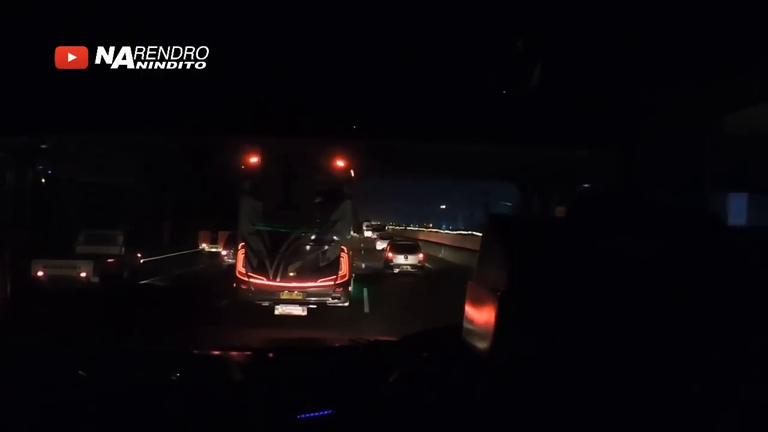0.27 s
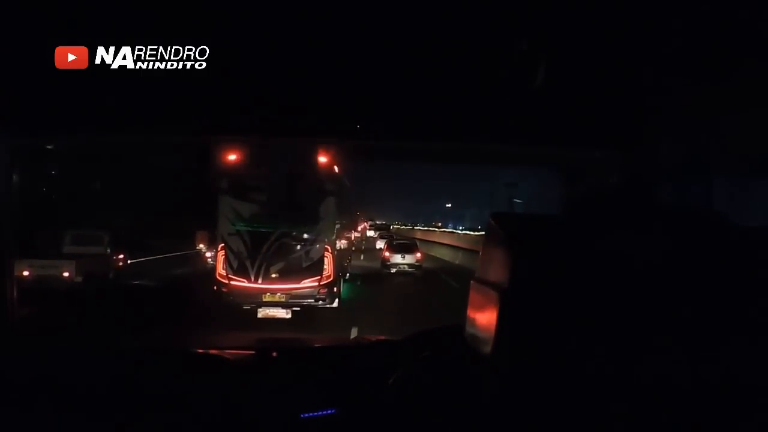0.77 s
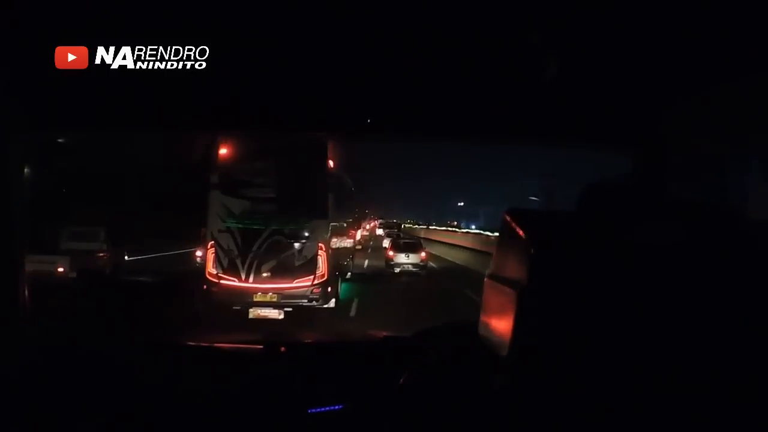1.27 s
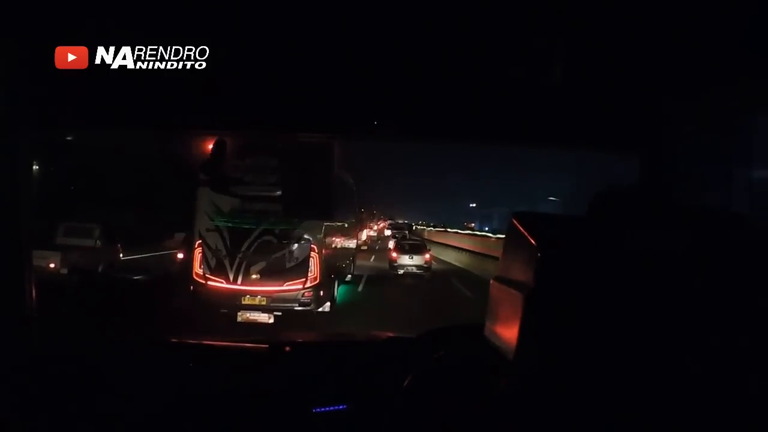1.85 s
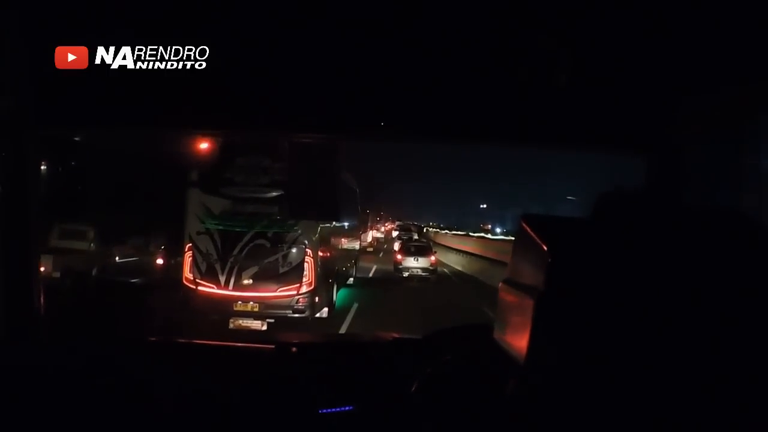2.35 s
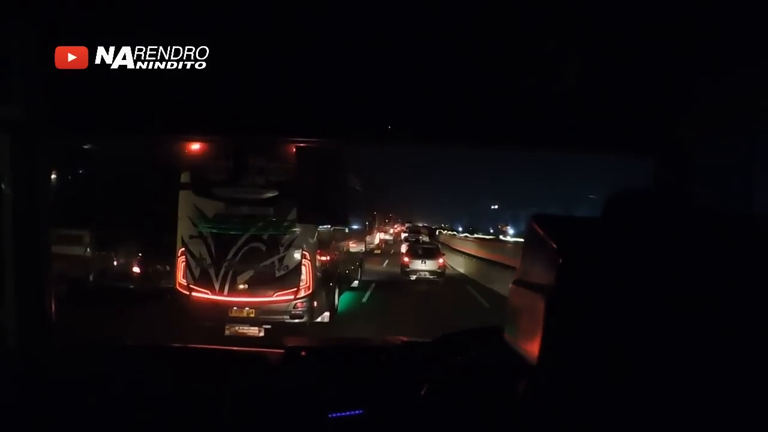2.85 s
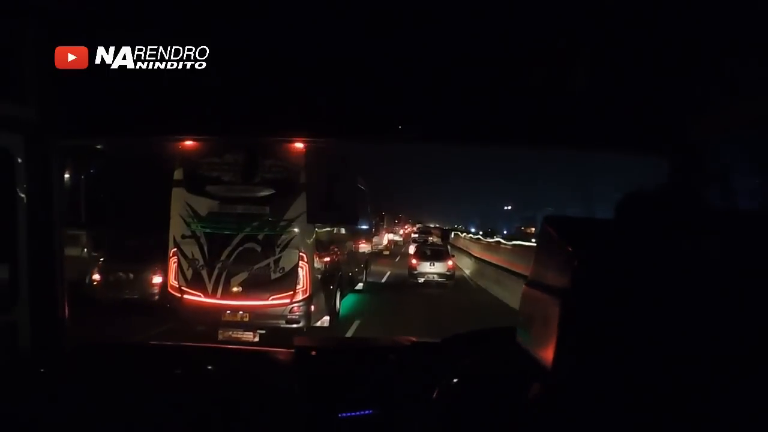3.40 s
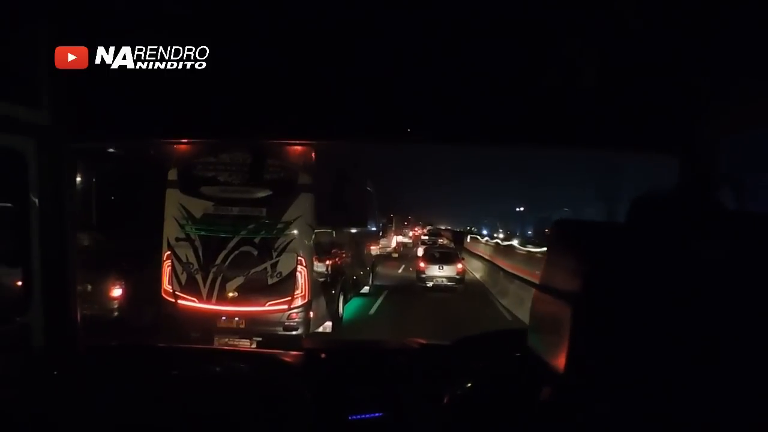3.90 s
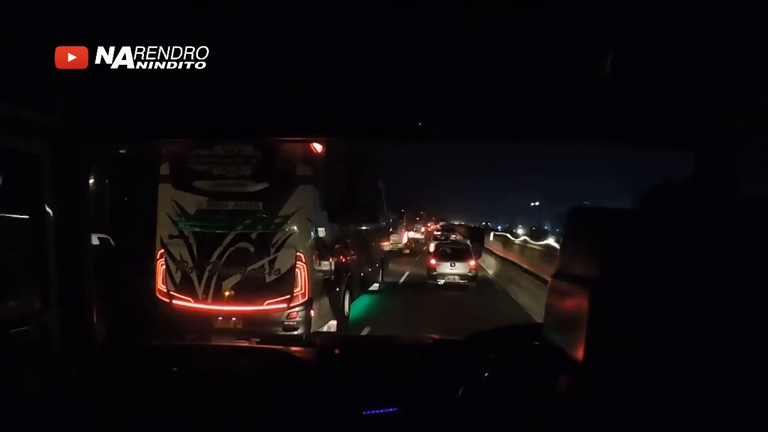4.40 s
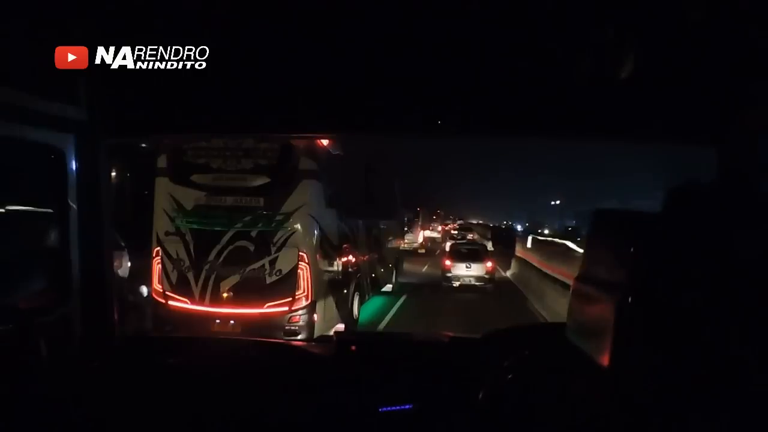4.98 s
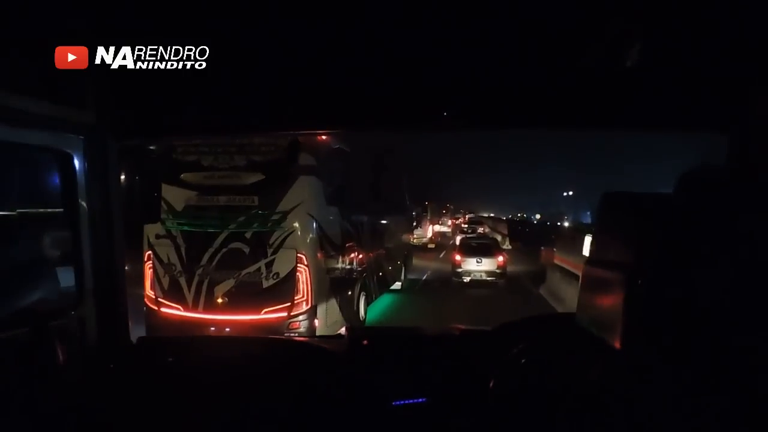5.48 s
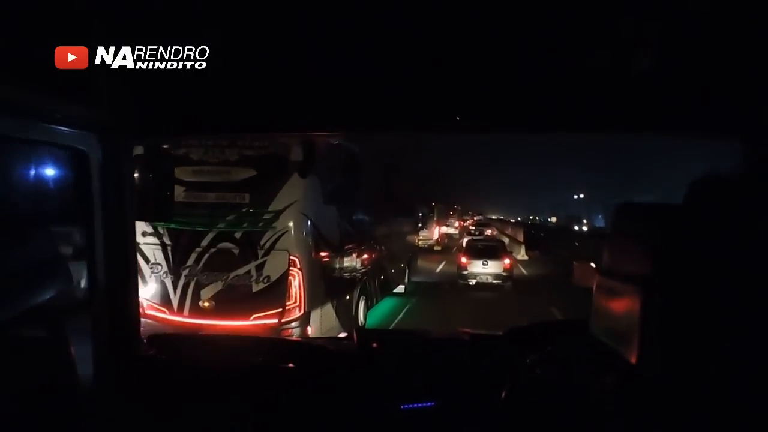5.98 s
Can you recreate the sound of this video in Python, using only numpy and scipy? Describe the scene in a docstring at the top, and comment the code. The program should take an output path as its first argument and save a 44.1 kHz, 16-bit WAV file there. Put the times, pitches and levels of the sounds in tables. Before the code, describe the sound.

A continuous bus cab interior lasting just over six seconds, close and bass heavy. A diesel drone around 70 Hz throbs about eight times a second, its pitch creeping up barely at all, over a very deep cabin boom, tyre rumble and changing road shudder. Muffled wind rush and soft seal hiss swell at about 1.2, 2.3, 3.6 and most strongly 5.4 seconds, easing between. Faint blower tones persist; a thin gear whine bends in from 1.7 to 4.3. A slightly brighter tyre wash passes between 1.3 and 2.3. Soft floor thumps come at 1.1, 2.2 to 2.3, 3.5, 3.8 and 5.5, with dull knocks at 2.26, 2.35 and 3.5 and a weaker one at 4.7. Tiny sharp ticks fall at 1.6 and 2.65. Brief high trim squeaks appear at 1.1, 2.6, 3.0, 4.35, 5.0, 5.3 and 6.0, over faint grainy panel rattle and narrow airy whistles.

```python
"""Inside a bus cab

A diesel engine throbs as wavering tones at multiples of its firing rate, with thin blower and gear whines.
Under it, shaped noise makes road shudder, tyre rumble and a deep boom of the cabin air.
Wind noise rushes in swells of an airflow curve and hisses at the seals with a level curve of its own.
Narrow bands of noise whistle at the seals, and damped tones thump the floor at bumps.
Panels rattle, loose fittings tick and knock in short noise bursts, and resonances of the trim squeak.
"""
import sys
import numpy as np
from scipy import signal
from scipy.fft import rfft, irfft
from scipy.io import wavfile
from scipy.ndimage import uniform_filter1d

SR = 44100
rng = np.random.default_rng(int(sys.argv[2]) if len(sys.argv) > 2 else 0)


def log_audio(samples):
    """Write samples as a 16-bit WAV file to the path given in sys.argv[1]."""
    # one column per channel
    frames = np.atleast_2d(samples).T
    # limit to full scale, then quantise
    limited = np.clip(frames, -1, 1)
    pcm = np.round(limited * 32767).astype(np.int16)
    wavfile.write(sys.argv[1], SR, pcm)


N = 275625
TIME = np.arange(N) / SR  # [s]
BINS = np.maximum(np.arange(N // 2 + 1) * SR / N, 1)  # frequency of each Fourier bin [Hz]


def from_db(db):
    """Logarithmic level: 20 dB is a factor of ten in amplitude."""
    return 10 ** (np.asarray(db) / 20)


def rms_one(x):
    """Normalisation: the mean of the channels is scaled to rms 1."""
    middle = np.atleast_2d(x).mean(axis=0)
    return x / np.sqrt(np.mean(middle ** 2) + 1e-20)


def in_time(rows):
    """Linear interpolation: each column of a curve is read sample by sample."""
    times, *columns = np.transpose(rows)
    return [np.interp(TIME, times, column) for column in columns]


def at_hz(points, hz):
    """Logarithmic frequency axis: equal ratios of frequency are equal steps."""
    table_hz, value = np.transpose(points)
    return np.interp(np.log(hz), np.log(table_hz), value)


def drift(rate_hz):
    """Low-passed noise: a slow random signal of rms 1."""
    return rms_one(irfft(rfft(rng.standard_normal(N)) / (1 + (BINS / rate_hz) ** 4), N))


def colour(spectrum):
    """Spectral shaping: the gain per bin follows a spectrum and falls steeply past its ends."""
    low_skirt = 1 + (spectrum[0][0] / BINS) ** 4
    high_skirt = 1 + (BINS / (2 * spectrum[-1][0])) ** 4
    return from_db(at_hz(spectrum, BINS)) / (low_skirt * high_skirt)


# interaural level difference: (frequency [Hz], left minus right [dB])
LEVEL_DIFFERENCE = [(17, -5.8), (30, -3.3), (55, -.2), (80, -.2), (140, 1.4), (320, 2), (750, 2.3),
                    (1500, .2), (14000, .3)]
# interaural phase difference: (frequency [Hz], lead of the left side [rad])
PHASE_LEAD = [(15, -0.51), (32, 0.94), (70, 0.46), (140, 0.32), (280, -0.25), (550, -0.4), (1300, -0.38),
              (1800, 0.25), (3000, -0.24)]


def pan(hz):
    """Interaural differences: complex gains place a frequency in the left and right channels."""
    sides = np.array([[.5], [-.5]])
    level = from_db(sides * at_hz(LEVEL_DIFFERENCE, hz))
    return level * np.exp(1j * sides * at_hz(PHASE_LEAD, hz))


# interchannel coherence of the noise: (frequency [Hz], left-right correlation [1 = alike])
COHERENCE = [(20, .985), (200, .985), (500, .91), (900, .8), (1500, .6), (2200, .1), (2800, -.1),
             (4000, -.22), (8000, 0), (14000, .15)]


def cab_noise(gain):
    """Diffuse field: coloured stereo noise, alike in the bass and less alike in the treble; rms 1."""
    mid, side = rfft(rng.standard_normal((2, N)))
    alike = np.clip(at_hz(COHERENCE, BINS), -.99, .99)
    shared = np.sqrt(1 + alike) * mid
    opposed = np.sqrt(1 - alike) * side * np.array([[1], [-1]])
    return rms_one(irfft((shared + opposed) * gain * pan(BINS), N))


def even(x, size):
    """Level control: a noise is held near rms 1 over windows of size samples."""
    power = uniform_filter1d(x.mean(axis=0) ** 2, size)
    return x / np.sqrt(power + 1e-3)


def line(hz, waver, waver_hz):
    """Random modulation: a stereo tone of rms about 1 wavers in strength and phase."""
    turns = np.cumsum(hz * np.ones(N)) / SR
    wander = drift(waver_hz) + 1j * drift(waver_hz)
    shake = (1 + waver * wander) * np.sqrt(2 / (1 + 2 * waver ** 2))
    return np.real(shake * np.exp(2j * np.pi * turns) * pan(np.mean(hz)))


def band(x, low_hz, high_hz):
    """Band-pass filtering: a causal Butterworth filter passes one range of frequencies."""
    edges = [low_hz, min(high_hz, SR / 2 - 500)]
    return signal.sosfilt(signal.butter(2, edges, "band", fs=SR, output="sos"), x)


def brighten(x, corner_hz, treble_db, order):
    """Time-varying shelf: the treble above a corner changes by treble_db."""
    dull = irfft(rfft(x) / (1 + (BINS / corner_hz) ** order), N)
    return dull + (x - dull) * from_db(treble_db)


# strength of the airflow round the body, used here relative to its mean: (time [s], level [dB])
AIRFLOW_LEVEL = [(0.05, -45.5), (0.5, -45), (0.56, -42.5), (0.75, -44.5), (0.89, -44.5), (1.16, -40),
                 (1.25, -43), (2.05, -41), (2.31, -37.5), (2.49, -43.5), (2.75, -42), (2.8, -44.5),
                 (2.95, -46), (3.14, -45.5), (3.51, -39.5), (3.77, -39.5), (3.92, -42), (4.12, -41.5),
                 (4.27, -44), (4.52, -42.5), (4.69, -41), (4.76, -44), (5.17, -44), (5.39, -40),
                 (5.46, -38), (5.52, -39), (5.65, -42.5), (5.78, -43.5), (6.21, -41.5)]


def swell(lag_s=0):
    """Common modulation: the airflow in dB about its mean, felt after a lag, drives many layers."""
    flow_db = in_time(AIRFLOW_LEVEL)[0]
    return np.interp(TIME - lag_s, TIME, flow_db - flow_db.mean())


# broadband spectrum of the rushing air: (frequency [Hz], relative level per Hz [dB])
RUSH_SPECTRUM = [(120, 3.5), (300, 0), (420, 0.5), (475, -3.5), (570, 0.5), (750, 0), (965, -3), (1015, -6),
                 (1220, -2.5), (1420, -7.5), (1900, -9.5), (2850, -15.5), (3500, -25), (6000, -52)]
# cab resonances that colour the rush: (centre [Hz], full width at half the dB height [Hz], height [dB])
CAB_RESONANCES = [(553, 69, 3.5), (816, 33, 4), (947, 49, 1.5), (2310, 180, -1.5), (2400, 59, 3.5)]
RUSH_DB, RUSH_FOLLOWS = -44, 1.3  # level at mean airflow [dB], dB gained per dB of airflow


def rush(ripple_db, bright_hz, brightening):
    """Flow noise: turbulent air excites the cab resonances, louder and brighter as it swells."""
    swell_db = swell()
    peaks_db = sum(db / (1 + (2 * (BINS - hz) / width) ** 2) for hz, width, db in CAB_RESONANCES)
    noise = even(cab_noise(colour(RUSH_SPECTRUM) * from_db(peaks_db + ripple_db)), size=4000)
    noise = brighten(noise, bright_hz, brightening * swell_db, order=4)
    return from_db(RUSH_DB + RUSH_FOLLOWS * swell_db) * noise


# spectrum of air escaping through the seals: (frequency [Hz], relative level per Hz [dB])
HISS_SPECTRUM = [(1500, 13), (3000, 1.5), (4800, 3), (6500, 0.5), (8000, -2.5), (11000, -2.5), (12300, 0),
                 (14200, 0.5), (16000, -7.5)]
# course of the hiss before HISS_OFFSET_DB: (time [s], level [dB])
HISS_COURSE = [(0.04, -69), (0.83, -66.5), (0.91, -70), (0.97, -64), (1.12, -64), (1.17, -61), (1.21, -65),
               (1.31, -67), (1.53, -64), (2.01, -63), (2.32, -58.5), (2.47, -65.5), (2.7, -63),
               (2.92, -68.5), (3.01, -65.5), (3.13, -68.5), (3.49, -61), (3.75, -61), (4.0, -63.5),
               (4.12, -61.5), (4.17, -65), (4.41, -65), (4.67, -61), (4.81, -66), (5.29, -63.5),
               (5.46, -57.5), (5.69, -64), (5.8, -65.5), (6.11, -61.5), (6.2, -64.5)]
HISS_OFFSET_DB = 1
HISS_WAVER_DB, HISS_WAVER_HZ = .5, 17
HISS_TOP_HZ, HISS_TOP_RISE_DB_PER_S = 11000, 0.54  # the hiss grows steadily brighter


def seal_hiss(ripple_db):
    """Jet noise: air at the seals hisses with its own level curve and random waver."""
    top_db = HISS_TOP_RISE_DB_PER_S * (TIME - TIME.mean())
    noise = cab_noise(colour(HISS_SPECTRUM) * from_db(ripple_db))
    noise = brighten(noise, HISS_TOP_HZ, top_db, order=16)
    waver_db = HISS_WAVER_DB * drift(HISS_WAVER_HZ)
    return from_db(in_time(HISS_COURSE)[0] + HISS_OFFSET_DB + waver_db) * noise


def wind(bright_hz, brightening, flutter_db):
    """Interference and flutter: rush and hiss share a rippled spectrum and fast level changes."""
    # reflections in the cab ripple the colour above the bass
    ripple = np.interp(BINS, np.arange(0, SR / 2, 35), rng.standard_normal(SR // 70))
    ripple_db = ripple * np.clip(BINS / 1000, 0, 1)
    air = rush(ripple_db, bright_hz, brightening) + seal_hiss(ripple_db)
    return air * from_db(flutter_db * drift(40))


# whistles at the seals, level at mean airflow before gain_db:
# (start [s], end [s], centre [Hz], half-width at half amplitude [Hz], level [dB])
SEAL_WHISTLES = [(1.6, 3.2, 800, 7, -57), (3.3, 4.1, 565, 18, -53), (4.4, 6.4, 581, 5, -56),
                 (2.65, 3.2, 2758, 22, -69)]
WHISTLE_FOLLOWS = 0.83  # dB gained per dB of airflow


def whistles(gain_db):
    """Aeroacoustic resonance: narrow airy tones fade in and out at the seals."""
    out = np.zeros((2, N))
    for start, end, hz, width_hz, db in SEAL_WHISTLES:
        progress = np.clip((TIME - start) / (end - start), 0, 1)
        fade = np.sqrt(np.abs(np.sin(np.pi * progress)))
        tone = even(cab_noise(1 / (1 + ((BINS - hz) / width_hz) ** 2)), size=5000)
        out += from_db(db + gain_db + WHISTLE_FOLLOWS * swell()) * fade * tone
    return out


COARSE_START_S, COARSE_END_S = 1.3, 2.26
COARSE_LOW_HZ, COARSE_HIGH_HZ, COARSE_DB = 1410, 3000, -56  # band, level at the height of the crossing


def coarse_asphalt():
    """Texture excitation: a brighter wash rises and fades as the tyres cross coarse asphalt."""
    progress = np.clip((TIME - COARSE_START_S) / (COARSE_END_S - COARSE_START_S), 0, 1)
    wash = rms_one(band(cab_noise(colour(RUSH_SPECTRUM)), COARSE_LOW_HZ, COARSE_HIGH_HZ))
    return from_db(COARSE_DB) * np.sin(np.pi * progress) * wash


# spectrum of the tyre rumble: (frequency [Hz], relative level per Hz [dB])
RUMBLE_SPECTRUM = [(55, -32), (72, 3.5), (88, 3.5), (115, -2), (150, -7), (180, -4), (228, -5), (260, -8.5),
                   (310, -11), (380, -18), (520, -24), (900, -52)]
RUMBLE_DB, RUMBLE_FOLLOWS = -36, 1  # level at mean airflow [dB], dB gained per dB of airflow
RUMBLE_WAVER_DB, RUMBLE_WAVER_HZ = 1.6, 12


def tyre_rumble():
    """Structure-borne noise: the tyres rumble unevenly through the floor."""
    waver_db = RUMBLE_WAVER_DB * drift(RUMBLE_WAVER_HZ)
    noise = even(cab_noise(colour(RUMBLE_SPECTRUM)), size=4000)
    return from_db(RUMBLE_DB + RUMBLE_FOLLOWS * swell() + waver_db) * noise


# spectrum of the shaken body: (frequency [Hz], relative level per Hz [dB])
SHUDDER_SPECTRUM = [(22, -3), (28, 0), (35, -4), (46, -16), (57, -12), (68, -24), (110, -40)]
# shaking of the body by the road, before gain_db: (time [s], level [dB])
SHAKING_COURSE = [(0.05, -28.5), (0.65, -25.5), (0.78, -36), (1.29, -26.5), (1.61, -34), (1.77, -33),
                  (2.69, -23.5), (2.81, -40), (3.75, -28), (4.21, -25), (4.38, -42), (4.65, -19.5),
                  (4.88, -27), (5.53, -27), (6.21, -27)]


def road_shudder(gain_db):
    """Forced vibration: the road shakes the body into deep, changing noise."""
    noise = even(cab_noise(colour(SHUDDER_SPECTRUM)), size=4500)
    return from_db(in_time(SHAKING_COURSE)[0] + gain_db) * noise


BOOM_DB, BOOM_FOLLOWS = -21, 0.76  # level at mean airflow [dB], dB gained per dB of airflow
BOOM_LAG_S = 0.16  # the cabin air answers the airflow late
BOOM_WAVER_DB, BOOM_WAVER_HZ = 1, 15


def boom(hz, width_hz):
    """Cavity resonance: buffeting drives the lowest resonance of the cabin air."""
    air = even(cab_noise(np.exp(-((BINS - hz) / width_hz) ** 2)), size=9000)
    waver_db = BOOM_WAVER_DB * drift(BOOM_WAVER_HZ)
    return from_db(BOOM_DB + BOOM_FOLLOWS * swell(BOOM_LAG_S) + waver_db) * air


# bumps in the road, peak level before gain_db: (time [s], pitch [Hz], level [dB])
ROAD_BUMPS = [(1.13, 122, -27), (2.17, 110.4, -24.5), (2.265, 136.5, -31), (2.325, 109, -25.5),
              (3.541, 149.5, -31), (3.799, 120, -34), (5.481, 112, -26.5)]
BUMP_RISE_S = 0.012  # time to the top of a thump


def bumps(gain_db):
    """Impulse response: each bump swells through the springs and rings the floor for a few cycles."""
    out = np.zeros((2, N))
    for start, hz, db in ROAD_BUMPS:
        age = np.maximum(TIME - start, 0)
        thump = age / BUMP_RISE_S * np.exp(1 - age / BUMP_RISE_S)
        tone = np.real(pan(hz) * np.exp(2j * np.pi * (hz * age + rng.random())))
        out += from_db(db + gain_db) * thump * tone
    return out


GRIT_PER_S = 170  # mean contacts per second
GRIT_DB, GRIT_FOLLOWS = -55.5, 1.6  # level at mean airflow [dB], dB gained per dB of airflow


def panel_rattle(low_hz, high_hz, spread_db):
    """Random impacts: panels rattle in small uneven contacts, harder as the airflow swells."""
    touches = rng.random(N) < GRIT_PER_S / SR
    strengths = from_db(spread_db * np.minimum(rng.exponential(1, N), 2))
    sizes = strengths * rng.choice([-1, 1], N)
    sides = 1 + .35 * rng.uniform(-1, 1, N) * np.array([[1], [-1]])
    rattle = rms_one(band(touches * sizes * sides + 1e-18, low_hz, high_hz))
    return from_db(GRIT_DB + GRIT_FOLLOWS * swell()) * rattle


# ticks and knocks of loose fittings, level before gain_db and the decay:
# (time [s], centre [Hz], decay time constant [s], level [dB])
LOOSE_FITTINGS = [(.545, 750, .02, -46), (.655, 6000, .004, -64), (.961, 3300, 0.0045, -60),
                  (1.025, 8000, .002, -63), (1.627, 8800, .002, -55), (2.259, 720, 0.01, -30.5),
                  (2.351, 676, 0.009, -28), (2.653, 8500, 0.0027, -54), (3.522, 580, .012, -34),
                  (4.674, 675, .03, -42)]


def taps(gain_db, spread):
    """Damped impact: each contact is a short noise burst that dies away in a fitting."""
    out = np.zeros((2, N))
    burst = cab_noise(np.ones_like(BINS))
    for start, hz, decay_s, db in LOOSE_FITTINGS:
        after = (TIME >= start) & (TIME < start + 10 * decay_s)
        ring = rms_one(band(burst[:, after], hz / (1 + spread), hz * (1 + spread)))
        decay = np.exp(-(TIME[after] - start) / decay_s)
        out[:, after] += from_db(db + gain_db) * ring * decay
    return out


# squeaks of the trim, which start half a length before the given time:
# (start of the ring-out [s], length [s], pitch [Hz], level of the tone at full stroke [dB])
TRIM_SQUEAKS = [(0.37, 0.022, 2890, -64.5), (0.802, 0.023, 2890, -62), (1.075, 0.02, 2910, -55),
                (2.585, 0.026, 2900, -58.5), (3.016, .026, 2900, -59.5), (4.35, 0.024, 2920, -59),
                (5.032, 0.027, 2910, -54), (5.082, .024, 2920, -62.5), (5.304, .02, 2800, -58.5),
                (6.042, .03, 2900, -55.5), (6.104, .027, 2890, -57.5)]
# resonances of the trim, before random scatter: (multiple of the pitch, relative level [dB])
TRIM_RESONANCES = [(.97, -8), (1, 0), (1.03, -9), (1.057, -7), (1.088, -9), (1.113, -13), (1.143, -10),
                   (1.19, -18), (1.25, -20), (1.31, -19)]
SQUEAK_ATTACK_S, SQUEAK_RING_S = .007, .011
SQUEAK_SCATTER_DB = 3  # random spread of each resonance from squeak to squeak


def squeaks(waver, waver_hz, side_lag):
    """Stick-slip friction: trim catches, rasps in a cluster of unsteady resonances and rings out."""
    out = np.zeros((2, N))
    wander = np.array([drift(waver_hz) + 1j * drift(waver_hz) for _ in TRIM_RESONANCES])
    shake = 1 + waver * wander
    sides = np.exp(1j * side_lag * np.array([[.5], [-.5]]))  # side_lag in radians
    for time, length, hz, db in TRIM_SQUEAKS:
        near = (TIME > time - length / 2) & (TIME < time + 10 * SQUEAK_RING_S)
        age = TIME[near] - time + length / 2
        song = 0
        for k, (ratio, mode_db) in enumerate(TRIM_RESONANCES):
            strength = from_db(mode_db + SQUEAK_SCATTER_DB * rng.standard_normal())
            turns = hz * ratio * age + rng.random()
            song = song + strength * shake[k, near] * np.exp(2j * np.pi * turns)
        ring_out = np.exp(-np.maximum(age - length / 2, 0) / SQUEAK_RING_S)
        stroke = np.minimum(age / SQUEAK_ATTACK_S, 1) * ring_out
        squeak = rms_one(np.real(song * sides) * stroke)
        out[:, near] += from_db(db) * squeak * np.sqrt(np.mean(stroke ** 2))
    return out


# gear whine that comes and goes with the load, before gain_db: (time [s], frequency [Hz], level [dB])
GEAR_WHINE = [(1.5, 935, -74), (1.75, 938, -57), (2.0, 946, -52), (2.35, 954, -48.5), (2.52, 952, -55),
              (2.85, 948, -53), (3.1, 951, -62), (3.3, 946, -62), (3.6, 945, -51.5), (4.1, 954, -58),
              (4.5, 958, -74)]


def gearbox(gain_db):
    """Gear meshing: one thin tone bends and swells with the load."""
    hz, db = in_time(GEAR_WHINE)
    return from_db(db + gain_db) * line(hz, waver=.6, waver_hz=12)


# whine of the blower, steady in pitch: (frequency [Hz], level at mean airflow [dB])
BLOWER_TONES = [(380, -62.5), (679, -59), (719, -61), (849, -60), (888, -61.5)]
WHINE_FOLLOWS = 0.63  # dB gained per dB of airflow


def blower():
    """Rotating machinery: tones of fixed pitch waver and grow with the airflow."""
    out = np.zeros((2, N))
    for hz, db in BLOWER_TONES:
        out += from_db(db + WHINE_FOLLOWS * swell()) * line(hz, waver=0.4, waver_hz=5)
    return out


THROB_HZ, THROB_DEPTH = 8.4, .36
THROB_SLIP = .18  # rms wander of the beat [cycles]


def throb():
    """Amplitude modulation: an uneven beat swells and thins the engine tones."""
    turns = THROB_HZ * TIME + THROB_SLIP * drift(3)
    beat = 1 + THROB_DEPTH * np.cos(2 * np.pi * turns)
    return beat / np.sqrt(1 + THROB_DEPTH ** 2 / 2)


# engine speed: (time [s], firing rate [Hz])
FIRING_RATE = [(0, 68.8), (1.0, 69.3), (2.0, 69.8), (3.0, 70.3), (4.0, 70.9), (5.0, 70.6), (6.25, 70.9)]
# tone at the firing rate, before drone_db and the throb: (time [s], level [dB])
FIRING_LEVEL = [(0.05, -28.5), (0.51, -36.5), (0.82, -25.5), (0.95, -43), (1.18, -24.5), (1.4, -41),
                (1.66, -31), (1.87, -36.5), (2.1, -25.5), (2.61, -47), (2.71, -32), (3.16, -45),
                (3.25, -29), (3.39, -39), (3.57, -24.5), (3.86, -44.5), (3.93, -35), (4.16, -25.5),
                (4.25, -49), (4.45, -41), (4.56, -30), (4.66, -39), (4.8, -28.5), (5.12, -39),
                (5.23, -29.5), (5.48, -39.5), (5.6, -25.5), (5.69, -50.5), (6.13, -27), (6.21, -69)]
# weaker engine orders, before orders_db, airflow and throb: (multiple of the firing rate, level [dB])
ENGINE_ORDERS = [(5 / 6, -42.5), (4 / 3, -47), (5 / 3, -45.5), (2, -42), (7 / 3, -45.5), (3, -39.5),
                 (10 / 3, -46.5), (4, -49)]


def engine(drone_db, orders_db, coupling):
    """Harmonic excitation: the firing tone swells in the cab and weaker engine orders ride on it."""
    firing_hz = in_time(FIRING_RATE)[0]
    firing = line(firing_hz, waver=.13, waver_hz=6)
    out = from_db(in_time(FIRING_LEVEL)[0] + drone_db) * firing
    # the weaker orders grow with the airflow curve
    airflow_db = coupling * swell()
    for order, db in ENGINE_ORDERS:
        tone = line(order * firing_hz, waver=0.4, waver_hz=2.5)
        out += from_db(db + orders_db + airflow_db) * tone
    return out * throb()


def scene():
    """Superposition: air, road, fittings and engine add up in the cab."""
    air = wind(bright_hz=1200, brightening=0.032, flutter_db=.5) + whistles(gain_db=1)
    road = coarse_asphalt() + tyre_rumble() + road_shudder(gain_db=-0.5) + bumps(gain_db=0.5)
    cabin = boom(hz=17.39, width_hz=4.4)
    fittings = panel_rattle(low_hz=455, high_hz=1500, spread_db=3.5) + taps(gain_db=-2, spread=0.24)
    trim = squeaks(waver=.5, waver_hz=70, side_lag=1.0)
    drive = gearbox(gain_db=-0.5) + blower()
    drive = drive + engine(drone_db=0.27, orders_db=-7.0, coupling=0.76)
    return air + road + cabin + fittings + trim + drive


CUTOFF_HZ = 15750


def record(dry):
    """Band limiting: an elliptic low-pass filter cuts the top steeply."""
    return signal.sosfilt(signal.ellip(12, .1, 80, CUTOFF_HZ, fs=SR, output="sos"), dry)


dry = scene()
out = record(dry)
log_audio(out)
```